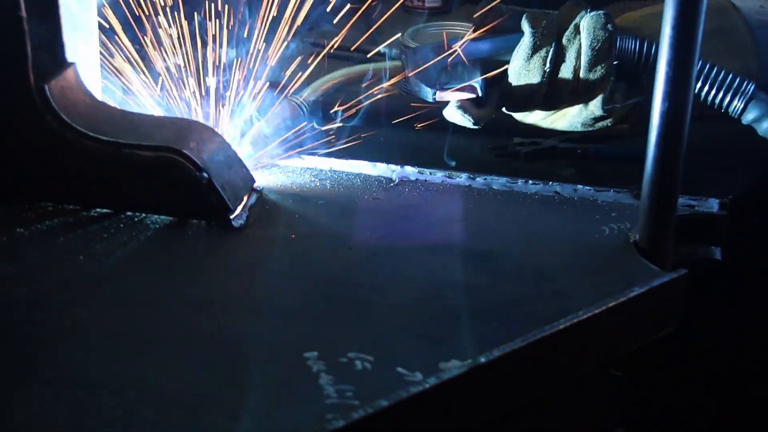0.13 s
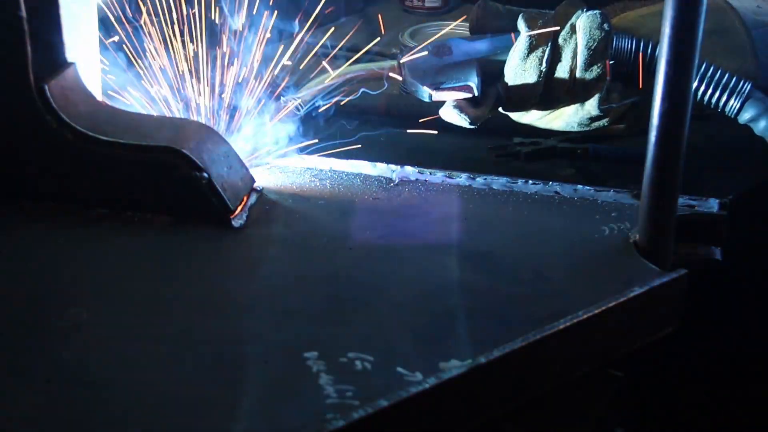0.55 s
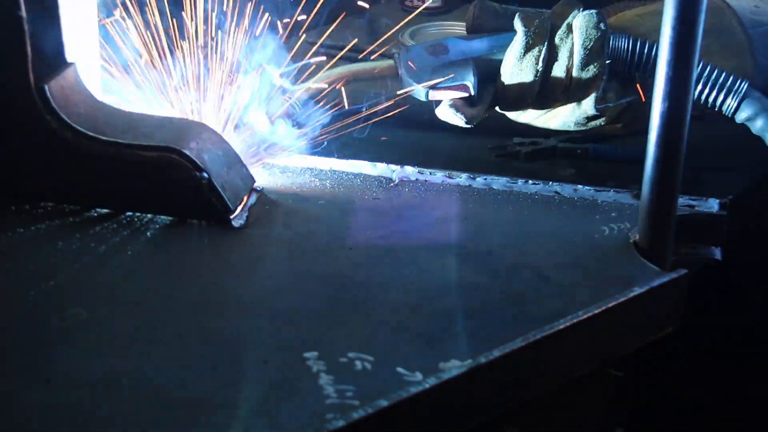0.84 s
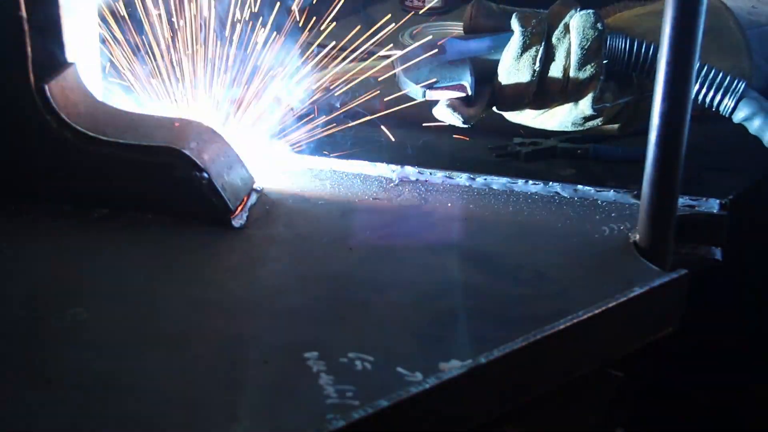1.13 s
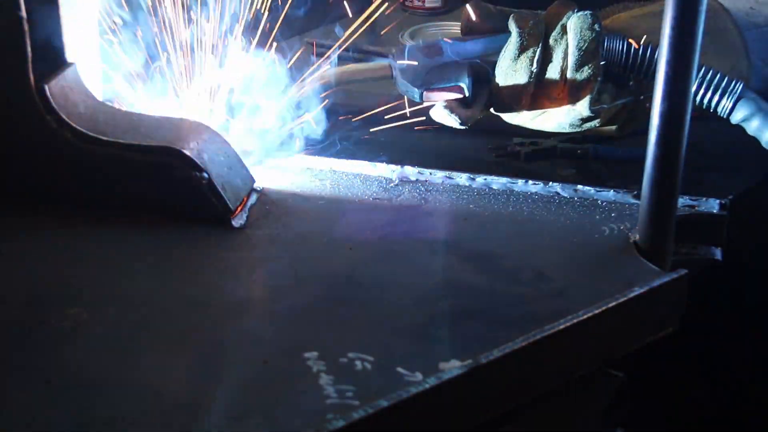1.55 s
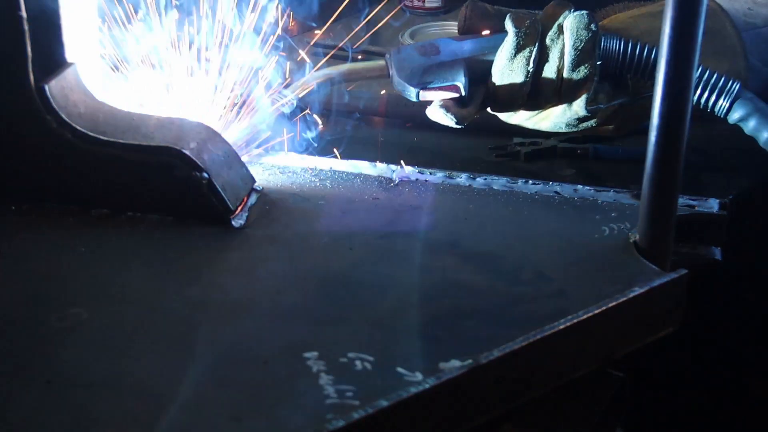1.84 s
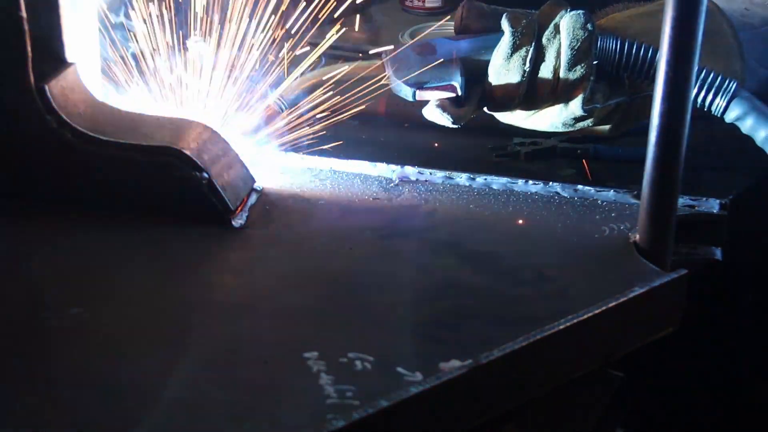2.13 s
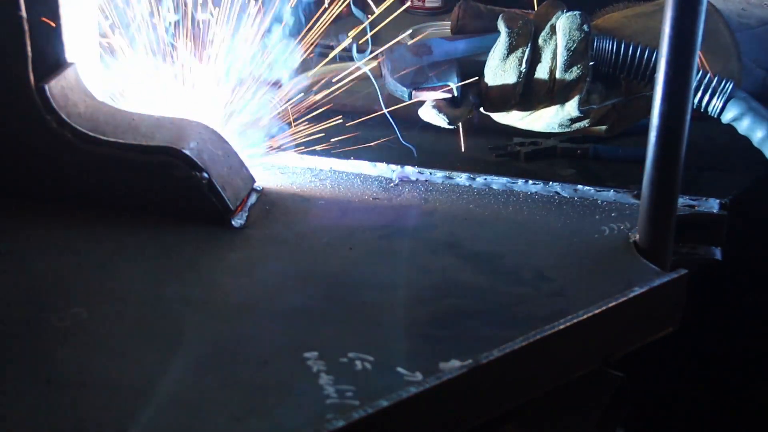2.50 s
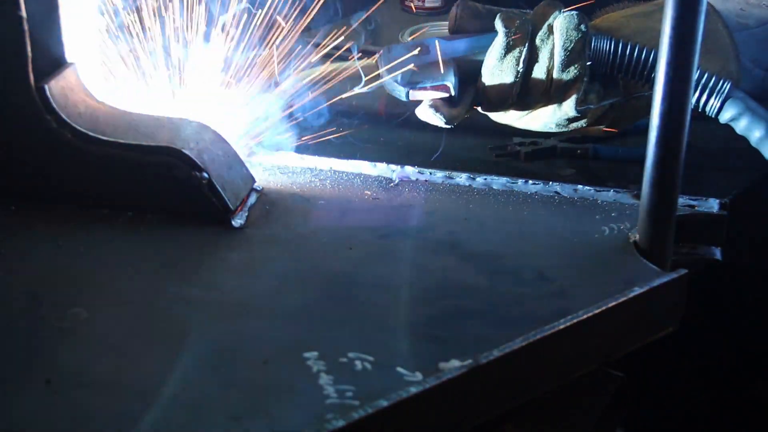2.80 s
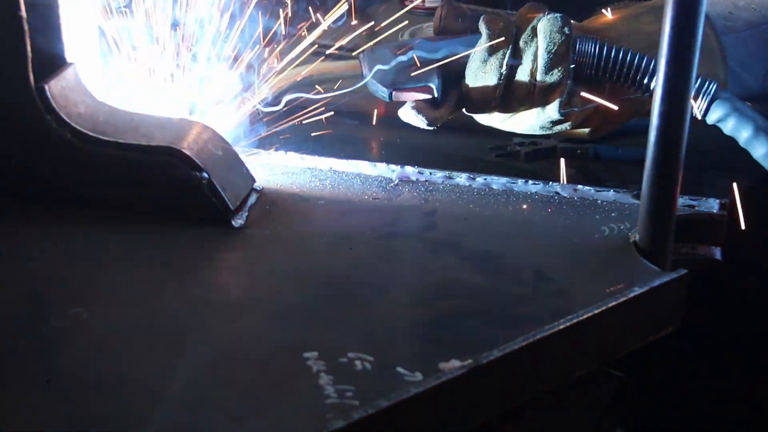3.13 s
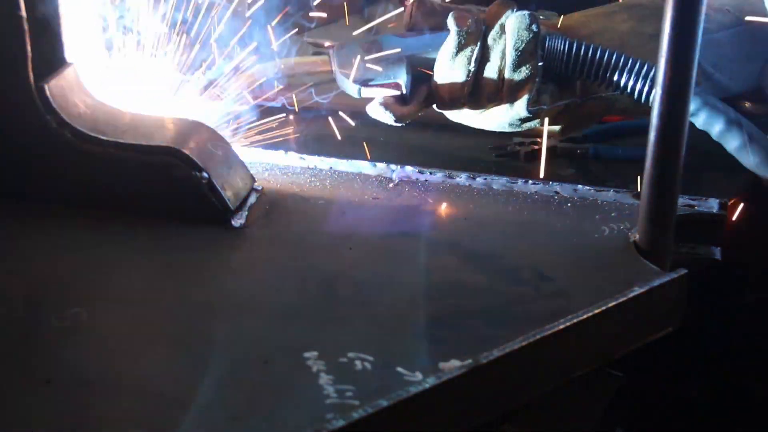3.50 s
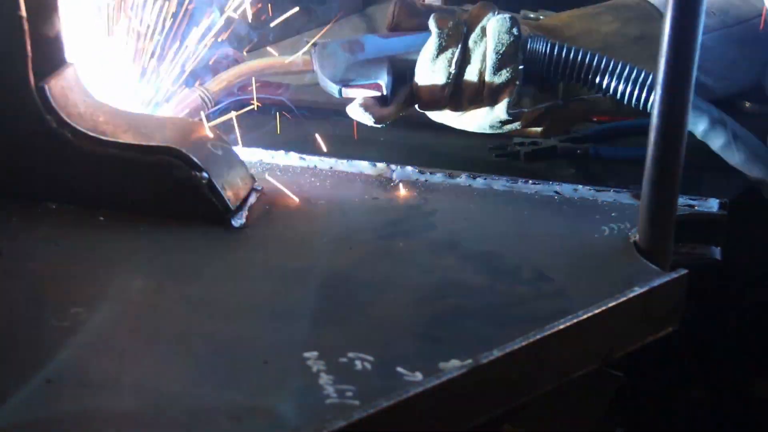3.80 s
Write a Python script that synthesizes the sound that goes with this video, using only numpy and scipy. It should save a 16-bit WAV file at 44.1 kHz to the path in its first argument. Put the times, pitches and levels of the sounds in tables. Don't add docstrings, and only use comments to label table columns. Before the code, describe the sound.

A welding arc burns on a steel plate throughout, a rough buzzing crackle of about 260 sharp clicks a second, uneven, with harder snaps and fine sizzle. From 0 to 2.9 s it is quiet, flickering, over faint hum, low rumble and gas hiss. At 2.92 s the recording level leaps abruptly; the crackle turns loud, denser and hissier to 4 s. Metallic ringing, dull molten thumps, short workshop reverberation.

```python
import sys
import numpy as np
from scipy import signal
from scipy.fft import rfft, irfft
from scipy.io import wavfile
from scipy.ndimage import uniform_filter1d, map_coordinates

SR = 44100
rng = np.random.default_rng(int(sys.argv[2]) if len(sys.argv) > 2 else 0)


def ratio(d):
    e = np.asarray(d, float) / 20
    return 10 ** e


def persist_wave(psi):
    counts = np.round(np.clip(psi, -1, 1) * 32767).astype(np.int16)
    wavfile.write(sys.argv[1], SR, np.atleast_2d(counts).T)


N = 174195
JUMP_S = 2.9158


def unit(x):
    return x / np.sqrt(np.mean(x ** 2))


def reson(x, hz, width_hz):
    b, a = signal.iirpeak(min(hz, 20000), hz / width_hz, fs=SR)
    return signal.lfilter(b, a, x)


def noise_band(hz, width_hz, passes=1):
    x = rng.standard_normal(N)
    for _ in range(passes):
        x = reson(x, hz, width_hz)
    return unit(x)


def walk(rate_hz):
    hold = int(SR / rate_hz)
    steps = np.repeat(rng.standard_normal(N // hold + 1), hold)
    return unit(uniform_filter1d(uniform_filter1d(steps, hold), hold)[:N])


def clicks(times, sizes):
    at = (times[times < N / SR] * SR).astype(int)
    return np.bincount(at, sizes[:len(at)], N)


# (time [s], arc level [dB], pool thump against the arc [dB], share of missed shorts [0-1])
ARC_SOFT = [(0, -42, -17, 0), (.11, -47, -18, 0.65), (.14, -41.5, -18, 0.22), (.36, -43.5, -15, 0.67),
            (.405, -48.5, -22, 0.45), (.425, -43, -19, 0.01), (.83, -40, -10.5, 0.14),
            (.85, -48, -17, 0.03), (1.05, -42, -16.5, 0.28), (1.66, -39, -8.5, 0.2),
            (2.08, -44.5, -25, 0.64), (2.2, -39.5, -10, 0.36), (2.88, -40.5, -17, 0.02),
            (2.91, -46.5, -33, 0.1)]
# (time [s], arc level [dB], pool thump against the arc [dB], share of missed shorts [0-1])
ARC_AFTER_JUMP = [(2.93, -24.5, -13, 0.18), (3.0, -23.5, -10.5, 0.15), (3.21, -23, -12, 0.1),
                  (3.335, -23, -8.5, .2), (3.355, -19, -16, 0.055), (3.385, -25, -18, .4),
                  (3.395, -22, -11, 0.086), (3.585, -24, -11, 0.18), (3.608, -23, -9.5, 0.048),
                  (3.89, -25, -12, 0.44), (3.906, -29.5, -15, 0.66), (3.914, -23, -9.5, .1),
                  (3.95, -24.5, -9, 0.12)]


def control(t, axis):
    soft, loud = (np.interp(t, np.array(c)[:, 0], np.array(c)[:, axis]) for c in (ARC_SOFT, ARC_AFTER_JUMP))
    return np.where(t < JUMP_S, soft, loud)


# (time [s], peak over the arc level
# [dB])
HARD_SHORTS = [(0.0101, 18.0), (0.0187, 14.0), (0.026, 19.0), (0.0342, 17.0), (0.1409, 16.0), (0.1677, 14.0),
               (0.2263, 18.0), (0.233, 16.0), (0.2408, 15.0), (0.2538, 16.0), (0.2676, 19.0), (0.3177, 15.0),
               (0.3252, 18.0), (0.3466, 15.0), (0.3672, 20.0), (0.3757, 16.0), (0.421, 15.0), (0.4296, 18.0),
               (0.4428, 18.0), (0.4508, 16.0), (0.4665, 15.0), (0.4855, 17.0), (0.4905, 15.0),
               (0.5256, 14.0), (0.5522, 15.0), (0.5705, 17.0), (0.6498, 17.0), (0.7307, 16.0),
               (0.7424, 15.0), (0.7531, 16.0), (0.7797, 14.0), (0.8003, 16.0), (0.8119, 16.0), (0.817, 21.0),
               (0.8254, 14.0), (0.8327, 16.0), (0.8593, 16.0), (0.8805, 16.0), (0.884, 15.0), (0.8906, 15.0),
               (0.9036, 18.0), (0.9152, 17.0), (0.9228, 15.0), (0.9348, 18.0), (0.954, 18.0), (0.9604, 16.0),
               (0.9792, 14.0), (0.9891, 16.0), (1.0024, 18.0), (1.0089, 14.0), (1.0159, 16.0), (1.023, 17.0),
               (1.0429, 17.0), (1.0651, 16.0), (1.1105, 16.0), (1.1371, 15.0), (1.1874, 14.0),
               (1.2274, 18.0), (1.2324, 14.0), (1.2757, 15.0),
               (1.3556, 14.0), (1.3603, 15.0), (1.4689, 19.0), (1.5616, 14.0), (1.5964, 17.0), (1.6012, 15.0),
             (1.638, 16.0), (1.6546, 14.0), (1.6697, 14.0), (1.676, 15.0), (1.738, 16.0), (1.8112, 17.0),
             (1.8203, 14.0), (1.8252, 14.0), (1.8385, 15.0), (1.843, 16.0), (1.8497, 16.0), (1.8667, 17.0),
             (1.8746, 14.0), (1.8806, 16.0), (1.902, 19.0), (1.9121, 14.0), (1.9614, 17.0), (1.9958, 17.0),
             (2.0044, 18.0), (2.0118, 14.0), (2.0197, 16.0), (2.0335, 14.0), (2.0478, 15.0), (2.0557, 14.0),
             (2.0629, 16.0), (2.0822, 16.0), (2.0905, 17.0), (2.0973, 17.0), (2.1031, 15.0), (2.1214, 13.0),
             (2.1317, 15.0), (2.1353, 16.0), (2.151, 14.0), (2.18, 17.0), (2.1975, 15.0), (2.2755, 14.0),
             (2.3476, 18.0), (2.3907, 16.0), (2.4134, 14.0), (2.4556, 15.0), (2.4948, 16.0), (2.5, 15.0),
             (2.5645, 15.0), (2.5889, 14.0), (2.6427, 14.0), (2.665, 18.0), (2.7393, 18.0), (2.7443, 15.0),
             (2.7498, 13.0), (2.7539, 15.0), (2.8248, 14.0), (2.8671, 14.0), (2.8782, 16.0), (2.885, 16.0),
               (2.9548, 14.0), (2.9611, 11.0), (2.9686, 13.0), (2.9917, 12.0), (2.9974, 12.0), (3.0517, 17.0),
             (3.0603, 12.0), (3.0696, 14.0), (3.0842, 11.0), (3.0938, 11.0), (3.1434, 12.0), (3.1485, 13.0),
             (3.1592, 14.0), (3.1804, 12.0), (3.2112, 11.0), (3.2332, 12.0), (3.2402, 11.0), (3.2444, 12.0),
             (3.2583, 17.0), (3.3416, 11.0), (3.3451, 12.0), (3.3513, 13.0), (3.3555, 14.0), (3.3907, 14.0),
             (3.4083, 12.0), (3.4171, 12.0), (3.4874, 13.0), (3.5148, 11.0), (3.5506, 12.0), (3.561, 11.0),
             (3.5955, 11.0), (3.6118, 12.0), (3.6163, 11.0), (3.6202, 13.0), (3.6756, 13.0), (3.6798, 14.0),
             (3.6836, 13.0), (3.6937, 12.0), (3.6969, 11.0), (3.7021, 12.0), (3.7091, 13.0), (3.7209, 14.0),
             (3.7258, 14.0), (3.7414, 13.0), (3.7518, 12.0), (3.7556, 14.0), (3.7701, 12.0), (3.7972, 12.0),
             (3.8039, 12.0), (3.8115, 14.0), (3.8308, 12.0), (3.8518, 12.0), (3.8653, 12.0), (3.8741, 15.0),
             (3.8844, 12.0), (3.9124, 13.0), (3.9156, 18.0), (3.9231, 12.0), (3.9345, 13.0), (3.9498, 12.0)]


def arc(t):
    shorts_hz, period_scatter, size_scatter_db = 262.1, 0.2, 7.5
    clear_s = 0.0025
    tint_db = 2
    sizzle_per_s, flicker_db = 2500, 1.04

    scatter, u = rng.standard_normal(2000), rng.random((2000, 4))
    at = np.cumsum(np.exp(period_scatter * scatter) / shorts_hz)
    not_missed = np.clip((u[:, 1] - control(at, axis=3)) * 10, 0, 1)
    size = ratio(-size_scatter_db * u[:, 0]) * not_missed * ratio(np.where(at < JUMP_S, -3.5, -6))

    hard_s, hard_db = np.array(HARD_SHORTS).T
    size *= abs(at[:, None] - hard_s).min(axis=1) > clear_s
    hard = clicks(np.minimum(hard_s, t[-1]), ratio(hard_db - 19 - 1.5 * (hard_s > JUMP_S)))

    dull, sharp = (clicks(at, size * ratio(-tint_db * u[:, k])) for k in (2, 3))
    shorts = hard + sharp + signal.filtfilt(*signal.butter(2, 6500, fs=SR), dull - sharp)

    gap, strength = rng.exponential(size=(20000, 2)).T
    sizzle = unit(clicks(np.cumsum(gap) / sizzle_per_s, strength - 1))
    sizzle_gain = ratio(-2 + 2.5 * (t > JUMP_S))
    return -(unit(shorts) + sizzle_gain * sizzle) * ratio(flicker_db * walk(25.04))


# (delay at the start [ms], at the gain jump [ms],
# at the end [ms], gain [ratio], negative = upside down)
ECHOES = [(.27, 0.32, 0.15, 0.16), (.53, .47, 0.24, 0.23), (.69, 0.567, 0.784, -0.41),
          (.86, 0.774, 0.39, 0.22), (1.3, 1.284, 0.97, 0.21), (1.45, 1.4, 1.54, 0.099),
          (1.8, 1.6, 3, 0.067), (3.62, 3.5, 3.4, 0.16), (3.75, 2.9, 4.3, -0.17), (4.45, 4.4, 4.3, 0.24),
          (4.8, 3.6, 3.9, 0.072), (7.4, 6.6, 11, 0.0094)]


def near_echoes(x, t):
    wobble_ms = np.where(t < JUMP_S, 0.0096, 0.041)
    echoes = np.zeros(N)
    for *lags_ms, gain in ECHOES:
        lag_ms = np.interp(t, (0, JUMP_S, t[-1]), lags_ms) + wobble_ms * walk(3)
        echoes += gain * map_coordinates(x, [(t - lag_ms / 1000) * SR])
    return x + ratio(-9 * (t > JUMP_S)) * echoes


# (pitch [Hz], width [Hz], level [dB])
STEEL = [
    (2070, 50, -2.5),
    (2530, 50, 17.5),
    (2790, 14, -9),
    (3627, 74, 26),
    (4500, 80, 7),
    (7180, 370, 29),
    (7300, 120, -85),
    (9250, 140, -76),
    (10400, 1100, 8),
    (13700, 110, -31),
]


def steel_ring(x):
    ring = np.zeros(N)
    for k, (hz, width_hz, db) in enumerate(STEEL):
        ring += (-1) ** k * ratio(db) * np.sqrt(100 / width_hz) * reson(x, hz, width_hz)
    return ratio(-11) * unit(ring) * np.std(x)


def even(response):
    f = rfft(response)
    power = abs(f) ** 2
    return irfft(f * np.sqrt(power.mean() / uniform_filter1d(power, size=75)), len(response))


def workshop_tail(x, t):
    turns = 0.41 * t / t[-1] + 0.51 * np.maximum(t - JUMP_S, 0)
    lag = t[:SR // 2]
    tails = np.zeros((2, len(lag)))
    # (time to fade by 60 dB [s], level [dB])
    for t60_s, db in ((0.011, -4), (0.03, -4.5), (0.73, -4.5)):
        noise = rng.standard_normal(tails.shape) * (lag > 0.0016)
        tails += ratio(db) * noise * 1000 ** (-lag / t60_s) / np.sqrt(t60_s * SR / 14)
    wet = np.zeros(N)
    for response, mix in zip(tails, (np.cos, np.sin)):
        wet += signal.fftconvolve(x * mix(2 * np.pi * turns), even(response))[:N]
    return wet


# (centre [Hz], width [Hz], share removed [0-1])
DIPS = [
    (401.5, 56, 1),
    (544, 130, 0.32),
    (3280, 880, 0.04),
    (1285, 128, 1),
    (2215, 347, 0.55),
    (2890, 400, 0.42),
    (4105, 510, 0.41),
    (8800, 460, 0.44),
]


def dips(x):
    for hz, width_hz, share in DIPS:
        x = x - share * reson(x, hz, width_hz)
    return x


# (frequency [Hz], level [dB])
CLICK = [
    (60, -19),
    (250, -18.5),
    (700, -10.5),
    (1600, -5),
    (3500, 1),
    (6000, -7),
    (8000, -9.5),
    (15800, -12.5),
]


def click_colour(x, size=1024):
    causal_share = 0.23
    hz = np.maximum(np.arange(size // 2 + 1) * SR / size, 20)
    points_hz, points_db = np.array(CLICK).T
    cep = irfft(np.log(ratio(np.interp(np.log(hz), np.log(points_hz), points_db))))
    cep[1:size // 2] *= 1 + causal_share
    cep[size // 2 + 1:] *= 1 - causal_share
    response = np.roll(irfft(np.exp(rfft(cep))), size // 2)
    coloured = signal.fftconvolve(x, response)[size // 2:][:len(x)]
    return unit(signal.lfilter(*signal.butter(2, 338, "high", fs=SR), coloured))


# (time [s], centre [Hz], level [dB])
NOZZLE = [
    (0, 5400, -4.5),
    (1.0, 5000, -13),
    (2.9, 4700, -22),
    (2.92, 4400, -7),
    (3.95, 6660, -12),
]


def nozzle(x, t):
    width_hz = 1100
    s, hz, db = np.array(NOZZLE).T
    turn = np.exp(2j * np.pi * np.cumsum(np.interp(t, s, hz)) / SR)
    ring = (signal.lfilter(*signal.butter(1, width_hz / 2, fs=SR), x / turn) * turn).real
    return ratio(np.interp(t, s, db) - 3) * unit(ring)


def pool(x, t):
    hz, width_hz = 821, 480 * 2.2
    thump = unit(reson(reson(x, hz, width_hz), hz, width_hz))
    return ratio(control(t, axis=2) - 3.5) * thump


def rumble(t):
    deep = ratio(-43) * noise_band(73, 43)
    fan_db = -24 + 0.56 * control(t, axis=2) + 0.5 * walk(15)
    return deep + ratio(fan_db) * noise_band(282, 580, passes=2)


def hum(t):
    level = ratio(-76 + 4 * walk(20)) * np.where(t < JUMP_S, 1, ratio(9.5))
    return level * np.sqrt(2) * np.sin(2 * np.pi * 101 * t + 0.72 * walk(7.7))


def shop():
    return ratio(-71.5) * noise_band(263, 380, passes=2)


def gas(t):
    return ratio(np.where(t < JUMP_S, -57, -40) + walk(21)) * noise_band(11000, 7300)


def scene():
    t = np.arange(N) / SR
    near = arc(t)
    heard = dips(near_echoes(near, t) + steel_ring(near) + workshop_tail(near, t))
    bright = click_colour(heard) + nozzle(heard, t)
    rise = np.where(t < JUMP_S, 1, 1 - 0.44 * np.exp(-np.maximum(t - JUMP_S, 0) / 0.00088))
    weld = ratio(control(t, axis=1)) * rise * (bright + pool(heard, t) + rumble(t))
    return (weld + hum(t) + shop() + gas(t))[None]


THIN_S = [.2757, .5123, .5965, 1.1508, 1.4483, 1.7067, 1.7908, 2.1319, 2.367, 2.4744, 2.5382, 2.7733, 3.2,
          3.4133]


def thin_out(x, size=940):
    above_rms, tilt, kept_gain_db = 2.2, 0.55, 4
    n = np.arange(2 * size)
    waves = np.cos(np.pi / size * np.outer(np.arange(size) + 0.5, n + 0.5 + size / 2))
    basis = waves * np.sin(np.pi * (n + 0.5) / (2 * size))
    at = (np.array(THIN_S) * SR).astype(int)[:, None] - size + n
    lines = x[at] @ basis.T
    local = uniform_filter1d(lines ** 2, size=61) + 1e-18
    limit = above_rms * np.sqrt(local ** tilt * local.mean(axis=1)[:, None] ** (1 - tilt))
    kept = np.where(abs(lines) > limit, lines * ratio(kept_gain_db), 0)
    y = x.copy()
    y[at] += (kept - lines) @ basis * 2 / size
    return y


def roll_off(x):
    return signal.sosfilt(signal.butter(12, 17000, fs=SR, output="sos"), x)


def record(dry):
    limit, top_hz = 0.7, 15800
    rounded = limit * np.tanh(dry[0] / limit)
    low_pass = signal.ellip(8, 0.1, 40, top_hz, fs=SR, output="sos")
    mixed = signal.sosfiltfilt(low_pass, thin_out(rounded))[None]
    return roll_off(mixed)


dry = scene()
out = record(dry)
persist_wave(out)
```